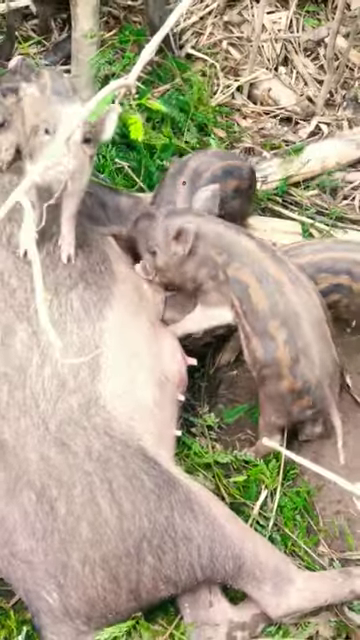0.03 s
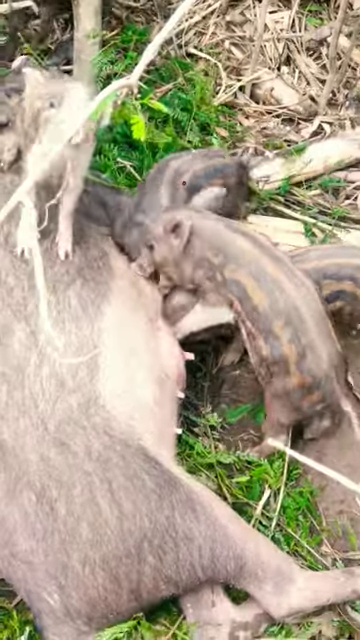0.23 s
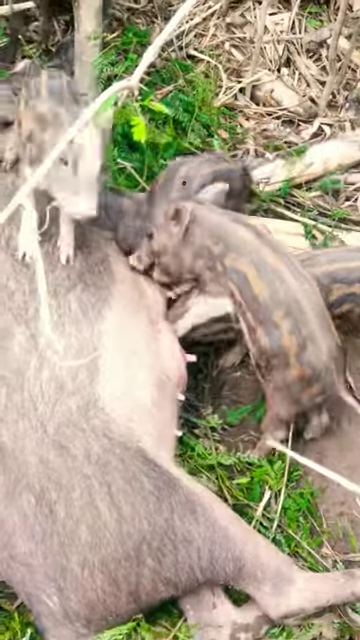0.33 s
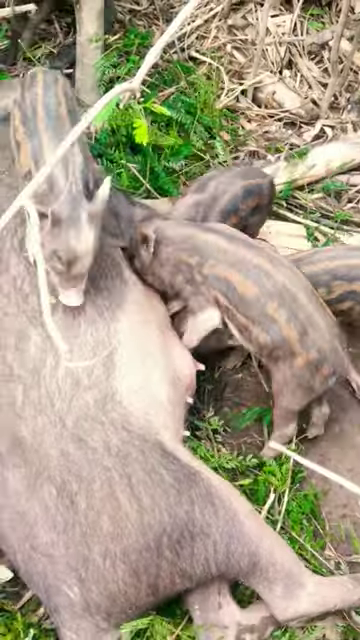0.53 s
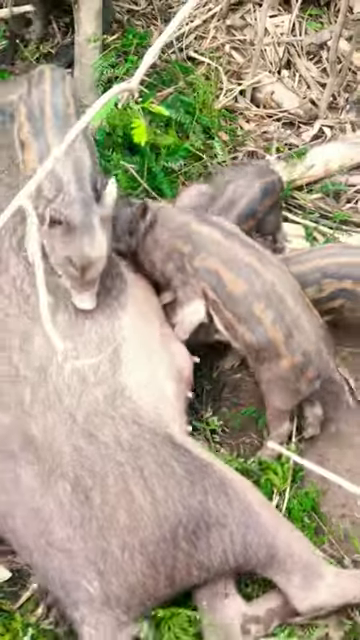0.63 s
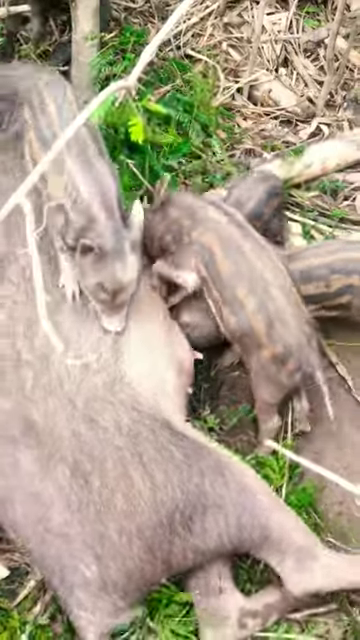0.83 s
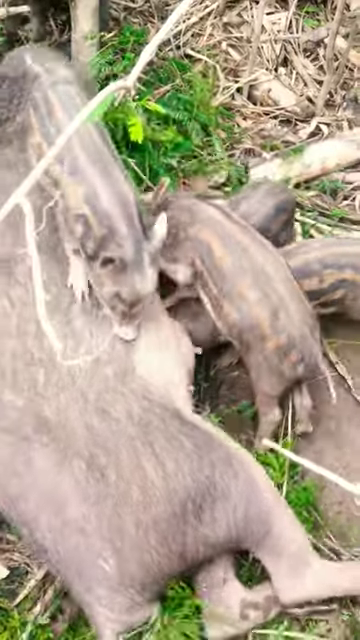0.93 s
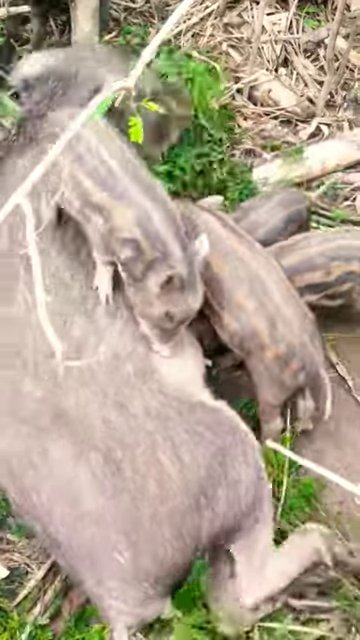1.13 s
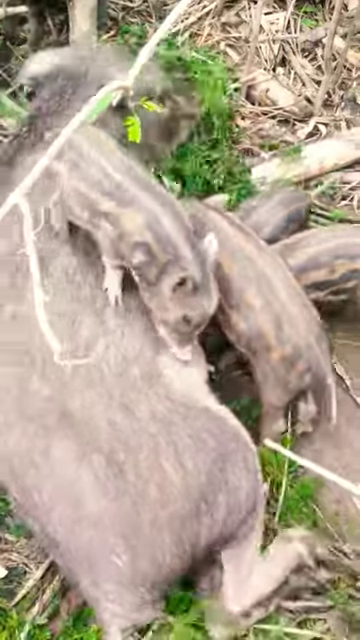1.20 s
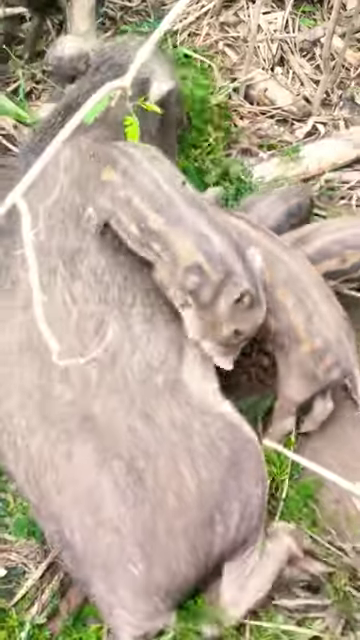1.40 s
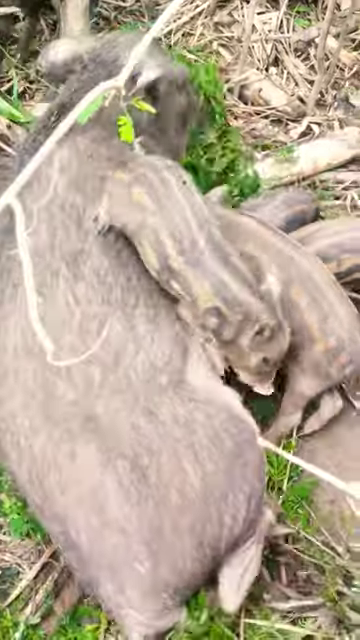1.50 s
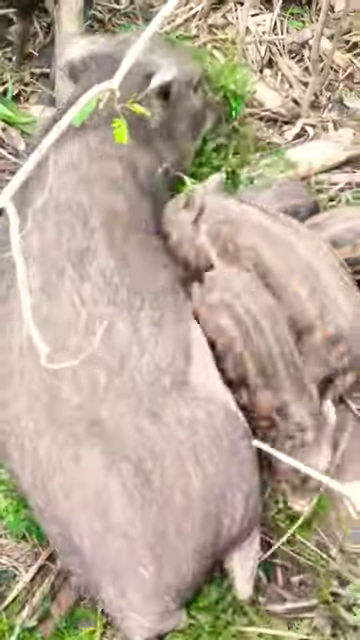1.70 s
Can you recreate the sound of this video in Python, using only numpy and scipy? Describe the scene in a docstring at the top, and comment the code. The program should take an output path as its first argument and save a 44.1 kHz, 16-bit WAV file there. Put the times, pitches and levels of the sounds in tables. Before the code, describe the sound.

Wild boar piglets squeal twice, raspy and shrill, then give thin peeps and short rattling grunts. Mouths smack and straw rustles softly underfoot, heard from a few steps away over a quiet outdoor hiss.

```python
"""Wild boar piglets at a sow

Piglets jostle at a lying sow, outdoors and a few steps away. Two raspy squeals, harmonics
shaped by throat and mouth, are followed by thin, nearly pure peeps and short rattling grunts,
air pulses that ring the snout. Mouths smack and plop, and straw rustles and ticks underfoot,
over a quiet outdoor hiss."""
import sys
import numpy as np
from scipy import signal
from scipy.fft import rfft, irfft
from scipy.io import wavfile

SR = 44100
rng = np.random.default_rng(int(sys.argv[2]) if len(sys.argv) > 2 else 0)


def transcribe(signal):
    """Save signal, clipped to [-1, 1], as a 16-bit WAV file at the path in sys.argv[1]."""
    frames = np.atleast_2d(signal).T
    limited = np.clip(frames, -1, 1)
    pcm = np.round(limited * 32767).astype(np.int16)
    wavfile.write(sys.argv[1], SR, pcm)


N = 77175
T = np.arange(N) / SR


def from_db(db):
    """Amplitude ratio of a level in decibels."""
    return 10 ** (np.asarray(db) / 20)


def unit_rms(x):
    """Normalisation to unit mean power."""
    return x / np.sqrt(np.mean(x ** 2) + 1e-20)


def in_time(rows):
    """Linear interpolation of breakpoints in time, one curve per column."""
    times, *columns = np.transpose(rows)
    return [np.interp(T, times, column) for column in columns]


def level_at(spectrum, hz):
    """Interpolation of level on a logarithmic frequency axis."""
    f, db = np.transpose(spectrum)
    return np.interp(np.log(hz + 1), np.log(f), db)


def coloured(x, spectrum):
    """Zero-phase spectral shaping, at unit rms."""
    gain = from_db(level_at(spectrum, np.arange(N // 2 + 1) * SR / N))
    return unit_rms(irfft(rfft(x) * gain, N))


def noise():
    """Gaussian white noise."""
    return rng.standard_normal(N)


def drift(corner_hz):
    """Random fluctuation: low-passed noise at unit rms."""
    r = np.exp(-2 * np.pi * corner_hz / SR)
    return unit_rms(signal.lfilter([1], [1, -2 * r, r * r], rng.standard_normal(2 * N))[N:])


def resonate(x, hz, width_hz):
    """Second-order resonance with unit peak gain."""
    r = np.exp(-np.pi * width_hz / SR)
    feedback = [1, -2 * r * np.cos(2 * np.pi * hz / SR), r * r]
    return signal.lfilter(np.array([1, 0, -1]) * (1 - r * r) / 2, feedback, x + 1e-18)


def gate(start, end, attack_s, release_s):
    """Amplitude envelope with quarter-sine edges."""
    ramp = np.minimum((T - start) / attack_s, (end - T) / release_s)
    return np.sin(np.pi / 2 * np.clip(ramp, 0, 1))


# Spectrum of the outdoor hiss: f/Hz, relative level/dB
AIR_SPECTRUM = [(25, -4.5), (60, 2), (110, 2), (200, -0.5), (350, -6.5), (600, -4.5), (1200, 6.5),
                (4000, -3), (8000, 0), (15000, -12.5)]


def outdoor_hiss():
    """Stationary broadband noise forms the background."""
    return from_db(-74) * coloured(noise(), AIR_SPECTRUM)


# Spectrum of the straw: f/Hz, relative level/dB
STRAW_SPECTRUM = [(300, -36), (550, -18), (800, -6.5), (1000, -6), (1170, 1.5), (1400, -0.5), (2000, 0.5),
                  (2900, 2), (4300, -2), (6600, -3.5), (7800, -15), (11000, -17), (15000, -19)]
# Envelope of the rustle: t/s, relative level/dB
RUSTLE_ENVELOPE = [(0, -60.5), (.07, -66.5), (.13, -61.5), (.21, -60.5), (.45, -59.5), (.52, -58),
                   (.6, -59), (.76, -57.5), (.81, -60.5), (.85, -57), (.93, -59.5), (1.01, -59.5),
                   (1.07, -56), (1.11, -58), (1.2, -61), (1.245, -65), (1.35, -63), (1.41, -67.5),
                   (1.46, -62), (1.5, -63), (1.6, -58.5), (1.66, -62), (1.7, -66.5), (1.75, -62.5)]


def straw_rustle(crackles_per_s=260, crackle_db=-10.5, flicker_db=1.63, trim_db=-1):
    """Straw shifting under the litter: amplitude-modulated noise with Poisson-timed crackles."""
    level_db, = in_time(RUSTLE_ENVELOPE)
    crackles = (rng.random(N) < crackles_per_s / SR) * noise()
    straw = coloured(noise(), STRAW_SPECTRUM) + from_db(crackle_db) * coloured(crackles, STRAW_SPECTRUM)
    return from_db(level_db + trim_db + flicker_db * drift(40)) * straw


# Reflections from ground and pen: delay/s, relative level/dB
REFLECTION_PATHS = [(.0047, -18), (.013, -18.5), (0.027, -38.5)]


def reflections(direct):
    """Multipath propagation: each surface returns a delayed, weaker copy."""
    return sum(from_db(db) * np.interp(T - delay, T, direct) for delay, db in REFLECTION_PATHS)


# Plops of a suckling mouth: t/s, envelope peak level/dB, f/Hz, duration/s
SUCKLING_PLOPS = [(0.417, -61, 846, 0.0097), (0.5674, -45.5, 818, 0.006), (1.2205, -63, 860, 0.006)]


def plop(start, db, hz, length):
    """A tone burst: the soft pop swells and dies within a few cycles."""
    progress = np.clip((T - start) / length, 0, 1)
    return from_db(db) * np.sin(np.pi * progress) ** 2 * np.sin(2 * np.pi * hz * (T - start))


# Ticks of straw, smacks of mouths and a breathy hiss opening the first grunt:
# t/s, level before the envelope/dB, decay time/s, f/Hz
NOISE_BURSTS = [(0.0378, -50, 0.0029, 3200), (.0822, -51.5, 0.0042, 1300), (.136, -53.5, 0.0058, 2230),
                (0.186, -46, 0.0015, 3380), (0.1903, -44, 0.0026, 2960), (.2144, -56, 0.0021, 2800),
                (.537, -50, 0.0042, 1610), (0.57, -46.5, 0.0021, 2340), (1.059, -57, 0.013, 4400),
                (1.1308, -55, 0.0032, 2530), (1.1662, -69, 0.0017, 2700), (1.336, -60, 0.025, 1260),
                (1.375, -50, 0.0014, 7900), (1.429, -61.5, .007, 1210), (1.46, -51, 0.0088, 6900),
                (1.517, -52, 0.0026, 6850), (1.53, -51.5, 0.0034, 3040), (1.5565, -46.5, 0.0029, 2980),
                (1.658, -61, 0.0038, 1390)]


def noise_burst(start, db, decay_s, hz, q=3.9, attack_s=.0015):
    """A noise-driven resonance and a broad band an octave higher share an exponential decay."""
    age = np.maximum(T - start, 0)
    body = unit_rms(resonate(coloured(noise(), STRAW_SPECTRUM), hz, hz / q))
    treble = from_db(-14) * unit_rms(resonate(noise(), 2 * hz, 2 * hz))
    return from_db(db) * (body + treble) * np.minimum(age / attack_s, 1) * np.exp(-age / decay_s)


# Snout formants: f/Hz, bandwidth before widening/Hz, relative level/dB
SNOUT_FORMANTS = [(646, 75, -16.5), (1590, 87, -1), (2167, 98, -1), (2550, 73, 2.5), (2950, 214, 5),
                  (3570, 270, -2), (5300, 780, -19), (6600, 1100, -23)]
# Grunts: t/s, duration/s, level/dB, pulse rate/Hz, low-formant gain/dB, high-formant gain/dB,
# hoarseness (bandwidth factor)
GRUNT_CALLS = [(1.0696, 0.029, -54, 78, -6.5, -4, 3.5), (1.127, 0.051, -55, 81, -1.5, -5, 1.9),
               (1.192, 0.0085, -54, 89, -19, 5, 3), (1.5545, 0.055, -53, 71, 4.5, -9, 0.76)]


def grunt(start, length, db, pulse_hz, low_db, high_db, hoarseness):
    """Pulse excitation: slow, separate puffs of air ring the formants of the snout."""
    edge_s, pulse_decay_s, pulse_floor, uneven_db = .004, .0045, .13, .9
    pulse_age = ((T - start) * pulse_hz % 1) / pulse_hz
    puffs = pulse_floor + np.exp(-pulse_age / pulse_decay_s)
    puffs *= gate(start - edge_s, start + length + edge_s, edge_s, edge_s)
    puffs *= from_db(uneven_db * drift(pulse_hz))
    tilt = [(1600, low_db), (2600, 0), (4500, high_db)]
    snout = 0
    for hz, width_hz, formant_db in SNOUT_FORMANTS:
        widened_hz = 2 * width_hz * hoarseness
        ring = resonate(resonate(puffs * noise(), hz, widened_hz), hz, widened_hz)
        snout += from_db(formant_db + level_at(tilt, hz)) * unit_rms(ring)
    return from_db(db) * unit_rms(snout) * np.sqrt(length * SR / N)  # rms over the call's duration


# Peeps: t/s, duration/s, f/Hz, pitch arch/Hz, pitch glide/Hz, level/dB, relative octave level/dB
PEEP_CALLS = [(0.762, 0.037, 2535, 13, -130, -57.5, -8), (0.85, 0.062, 2420, 76, -70, -48.5, -16),
              (1.258, 0.072, 1430, 130, 9.5, -53, -17)]


def peep(start, length, pitch_hz, arch_hz, glide_hz, db, octave_db, jitter=.007, shimmer_db=1.0):
    """Frequency modulation: a nearly pure whistle follows a parabolic pitch contour."""
    position = np.clip(2 * (T - start) / length - 1, -1, 1)
    contour_hz = pitch_hz + arch_hz * (1 - position ** 2) + glide_hz * position / 2
    phase = 2 * np.pi * np.cumsum(contour_hz * (1 + jitter * drift(90))) / SR
    tone = np.sqrt(2) * (np.sin(phase) + from_db(octave_db) * np.sin(2 * phase))
    envelope = gate(start, start + length, attack_s=.022, release_s=.024)
    return from_db(db + shimmer_db * drift(90)) * envelope * tone


def mouth_resonance(offset_hz, half_width_hz=470):
    """Lorentzian resonance curve of unit height."""
    return 1 / (1 + (offset_hz / half_width_hz) ** 2)


# Spectra of the squeals' throat filter, rasp and hiss: f/Hz, relative level/dB
THROAT_SPECTRUM = [(450, -28), (1000, -36), (1600, -35), (2050, -13), (2450, 0), (2900, 0.5), (3450, 5),
                   (4000, -12), (4500, -6.5), (4950, -0.5), (5500, 0), (6000, -12), (6600, -16),
                   (7400, -26), (8400, -13), (11000, -22.5), (15000, -32)]
RASP_SPECTRUM = [(300, -37), (800, -36), (1300, -19), (2100, -12), (2450, -0.5), (2750, -4.5), (3250, -3.5),
                 (3800, 0), (4150, -18.5), (6000, -31.5)]
HISS_SPECTRUM = [(300, -61), (3000, -37), (4200, -1), (5000, 2), (5600, 3.5), (6500, -1.5), (7400, -10),
                 (8400, -12.5), (10500, -16), (12500, -36), (15000, -19)]
# Breakpoints, one list per squeal: t/s, fundamental f/Hz, voice level/dB, mouth resonance f/Hz,
# mouth boost/dB, treble gain/dB, rasp level/dB, hiss level/dB
SQUEAL_CONTOURS = [
    [(.22, 520, -73, 3200, 2, -16, -85, -70), (.242, 525, -48.5, 3240, 10, -18, -50.5, -59.5),
     (.258, 488.6, -54, 2850, 16, -13, -49, -46.5), (.271, 495, -46, 2450, 16, 3, -51, -52),
     (.3, 495, -40, 2490, 11, 6, -44.5, -48.5), (.319, 514, -39, 2640, 12, -5, -45, -52),
     (.333, 488, -43, 2780, 12.5, -7, -53, -49), (.352, 474, -43, 3040, 7, 4, -76, -63),
     (.371, 486.7, -45.5, 2600, 21, -9.5, -50.5, -59.5), (.399, 476, -41, 2950, 18, 0, -50, -62.5),
     (.413, 467, -43, 3170, 24, -22, -51.5, -57.5), (.426, 448, -46, 2400, 16, -30, -55, -65),
     (.438, 415, -66, 2100, 32, -15, -90, -60)],
    [(.604, 450, -80, 3500, 10, -8, -70, -72), (.618, 455, -51, 3650, 16, -6, -57, -58),
     (.633, 478, -46, 4150, 25, 0, -56, -53), (.647, 452, -55, 3600, 8, 3, -54, -55),
     (.66, 421, -52, 2500, 9, -8, -53, -58), (.672, 428, -45.5, 2500, 19, -11, -52, -60),
     (.697, 436, -49.5, 2540, 16, -7, -65, -72), (.72, 447, -52.5, 2630, 27, 4.5, -61, -68),
     (.74, 451, -73, 2680, 8, 3, -67, -72)],
]


def squeal(contour, jitter=.0025, shimmer=.15, roughness=.2, fray=.15):
    """Source and filter: a moving mouth resonance selects rough harmonics, amid pulsed rasp and hiss."""
    treble_hz, octave_share, puff_depth = 4330, .45, .5
    pitch_hz, voice_db, mouth_hz, boost_db, treble_db, rasp_db, hiss_db = in_time(contour)
    phase = 2 * np.pi * np.cumsum(pitch_hz * (1 + jitter * drift(90))) / SR
    on = (T > contour[0][0]) & (T < contour[-1][0])
    voice, power = np.zeros(N), np.full(N, 1e-12)
    for k in range(1, 29):
        hz = k * pitch_hz[on]
        mouth = mouth_resonance(hz - mouth_hz[on])
        mouth += octave_share * mouth_resonance(hz - 2 * mouth_hz[on])
        shelf_db = treble_db[on] / (1 + (treble_hz / hz) ** 20)
        gain = from_db(level_at(THROAT_SPECTRUM, hz) + boost_db[on] * mouth + shelf_db)
        # Uneven cycles fray the harmonics in amplitude and phase, the high ones most.
        wobble = 1 + roughness * hz / treble_hz * (drift(45)[on] + 1j * drift(45)[on])
        wobble += fray * drift(200)[on]
        harmonic = np.exp(1j * (k * phase[on] + rng.uniform(0, 2 * np.pi)))
        voice[on] += gain * np.real(wobble * harmonic)
        power[on] += gain ** 2 / 2
    puffs = 1 + puff_depth * np.cos(phase)  # one puff of noise per cycle
    rasp = from_db(rasp_db) * coloured(puffs * noise(), RASP_SPECTRUM)
    hiss = from_db(hiss_db) * coloured(puffs * noise(), HISS_SPECTRUM)
    voice *= from_db(voice_db) * (1 + shimmer * drift(124)) / np.sqrt(power)
    return voice + on * (rasp + hiss)


def scene():
    """Superposition of direct sound, its reflections and the background, in one channel."""
    direct = sum(squeal(contour) for contour in SQUEAL_CONTOURS)
    direct += sum(peep(*row) for row in PEEP_CALLS)
    direct += sum(grunt(*row) for row in GRUNT_CALLS)
    direct += sum(noise_burst(*row) for row in NOISE_BURSTS)
    direct += sum(plop(*row) for row in SUCKLING_PLOPS)
    return (direct + reflections(direct) + straw_rustle() + outdoor_hiss())[None]


def record(dry):
    """Band limiting: an elliptic low-pass cuts the top steeply."""
    cutoff_hz = 15450
    return signal.sosfilt(signal.ellip(12, .1, 70, cutoff_hz, fs=SR, output="sos"), dry)


dry = scene()
out = record(dry)
transcribe(out)
```